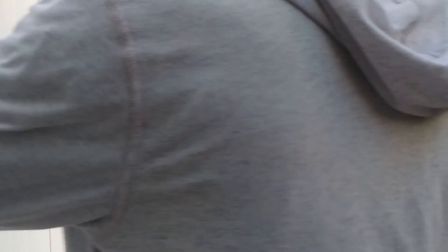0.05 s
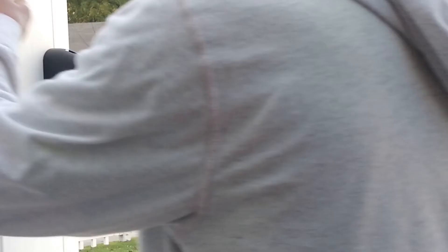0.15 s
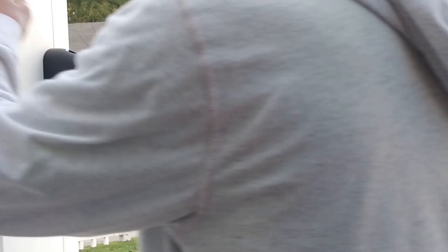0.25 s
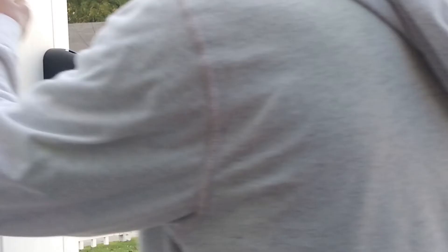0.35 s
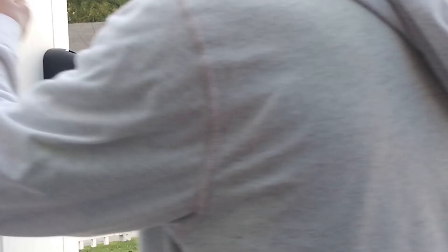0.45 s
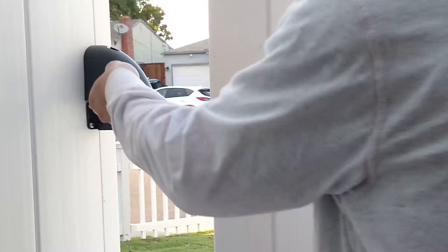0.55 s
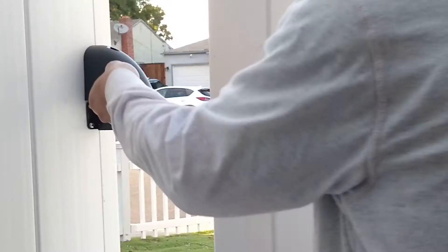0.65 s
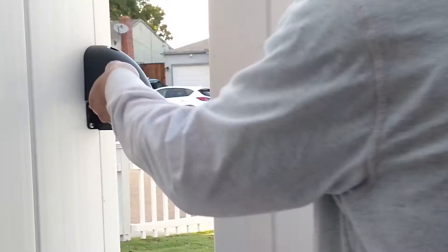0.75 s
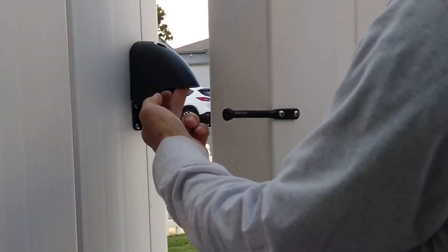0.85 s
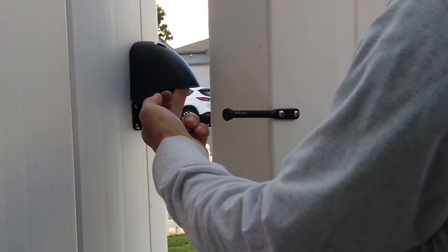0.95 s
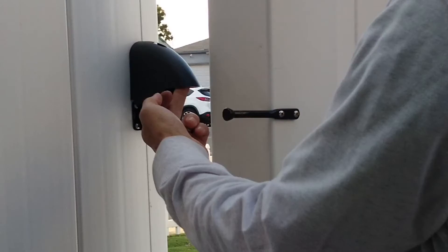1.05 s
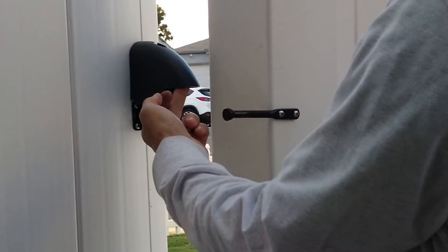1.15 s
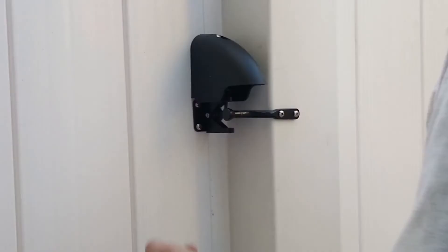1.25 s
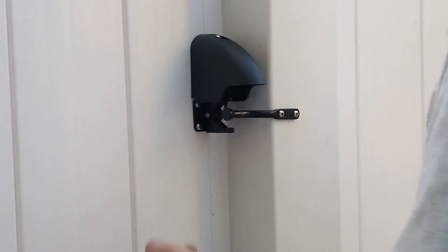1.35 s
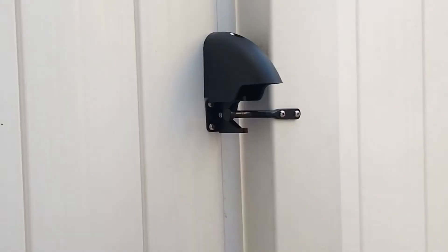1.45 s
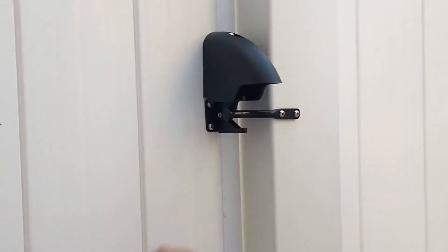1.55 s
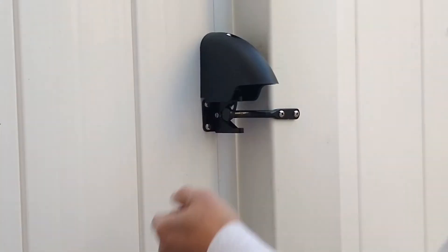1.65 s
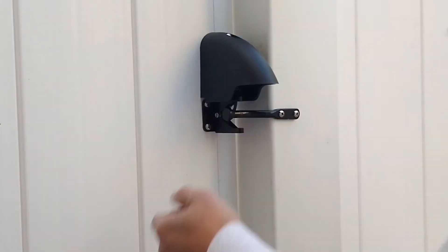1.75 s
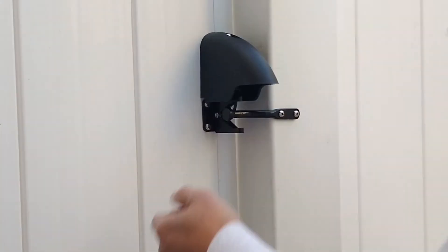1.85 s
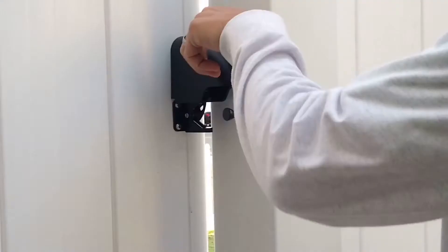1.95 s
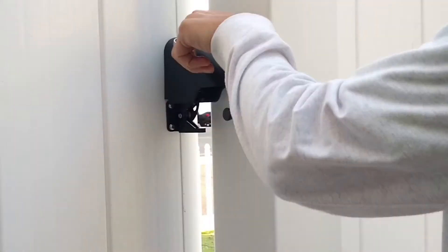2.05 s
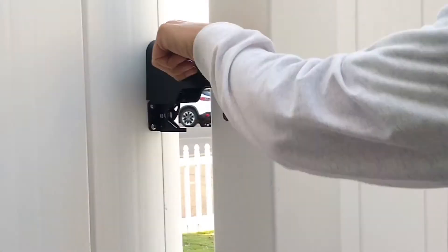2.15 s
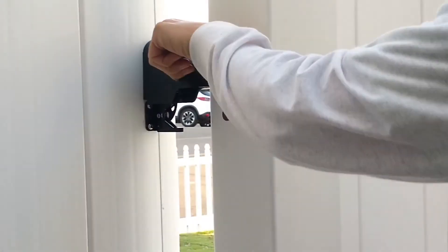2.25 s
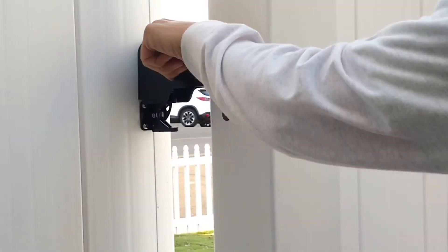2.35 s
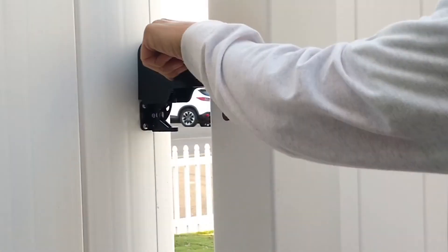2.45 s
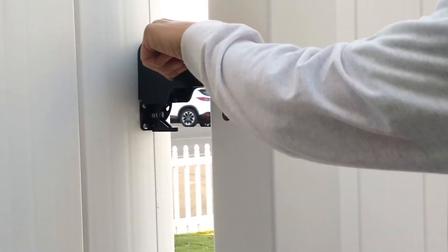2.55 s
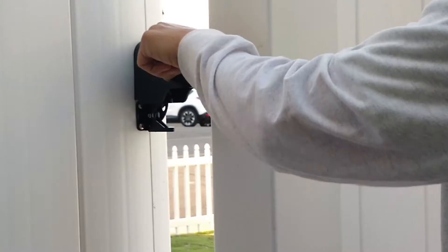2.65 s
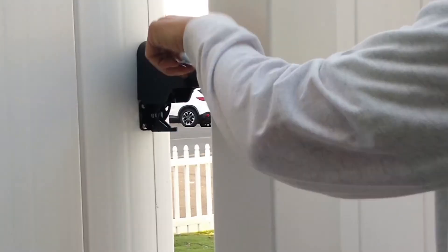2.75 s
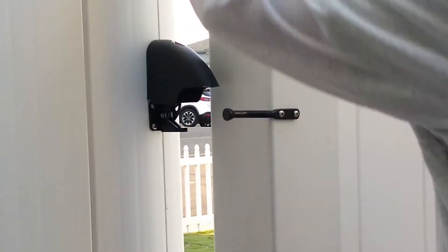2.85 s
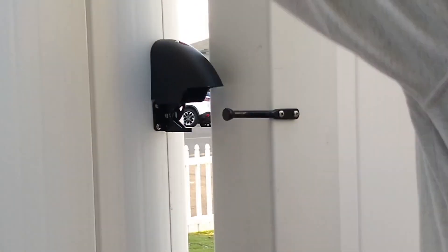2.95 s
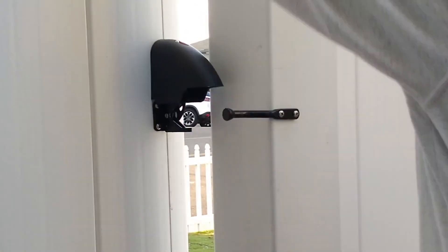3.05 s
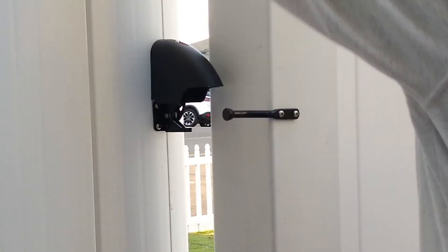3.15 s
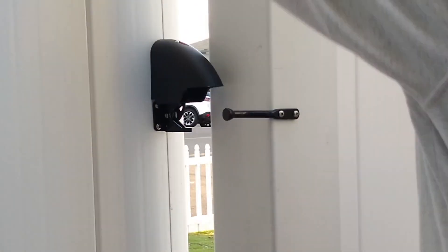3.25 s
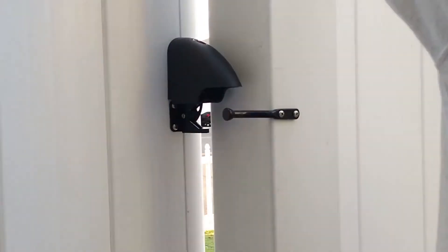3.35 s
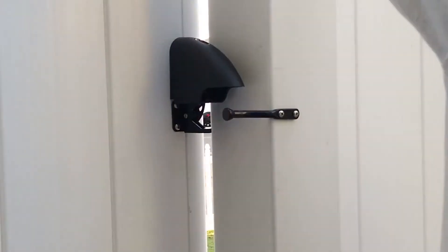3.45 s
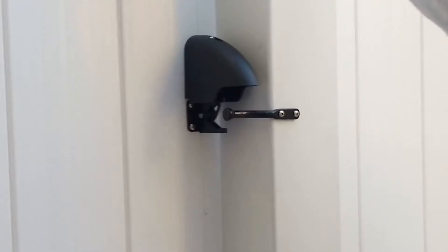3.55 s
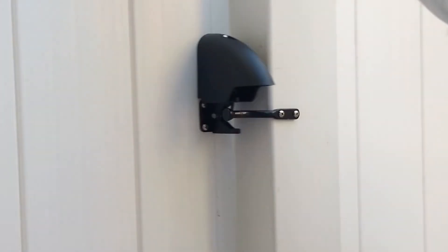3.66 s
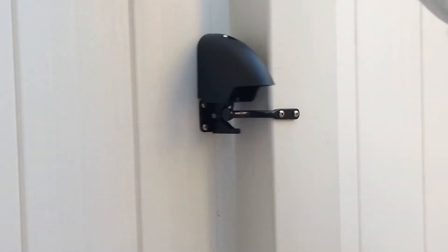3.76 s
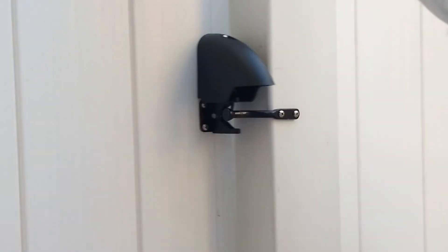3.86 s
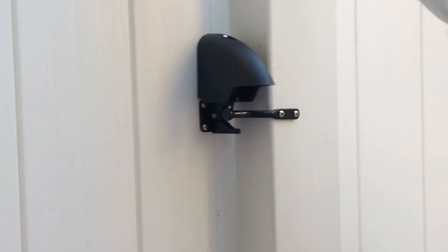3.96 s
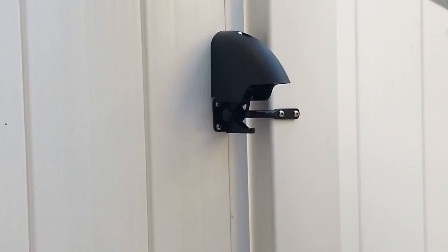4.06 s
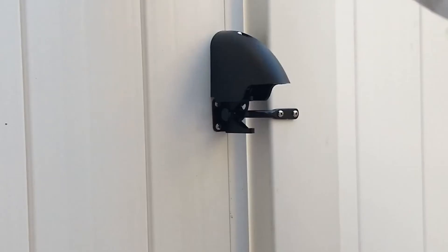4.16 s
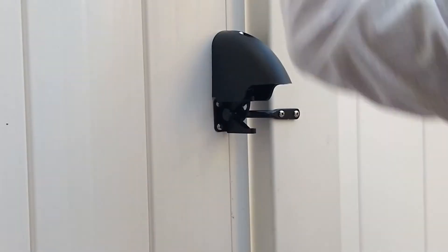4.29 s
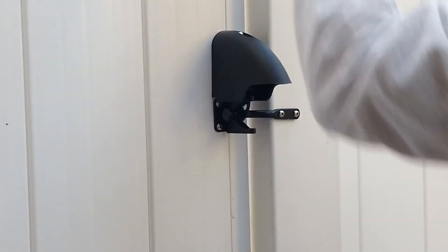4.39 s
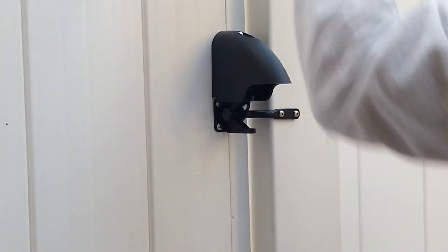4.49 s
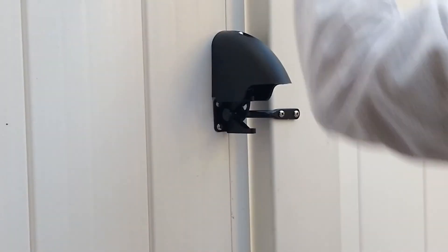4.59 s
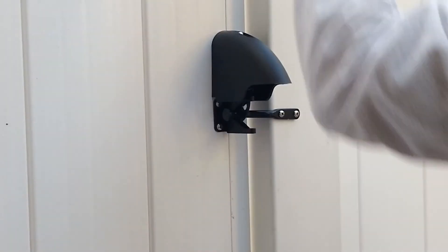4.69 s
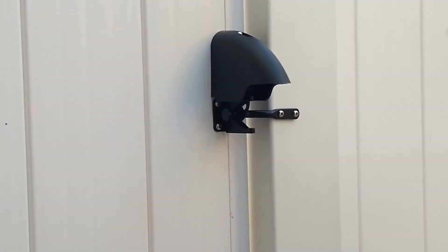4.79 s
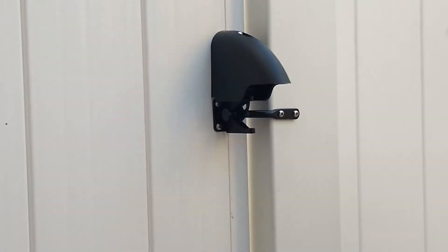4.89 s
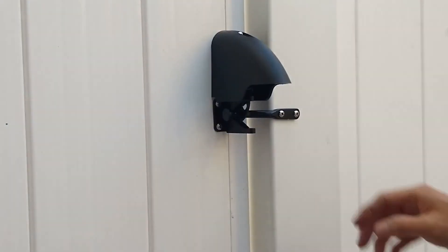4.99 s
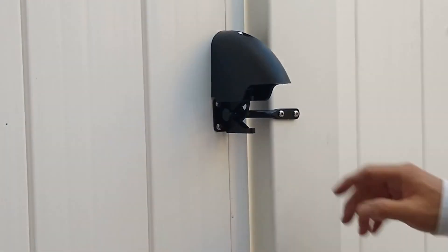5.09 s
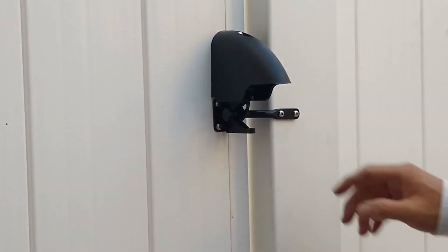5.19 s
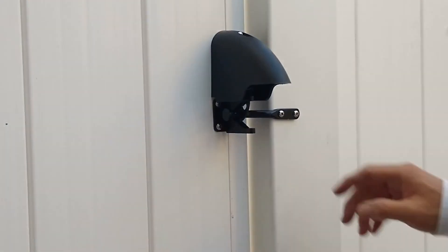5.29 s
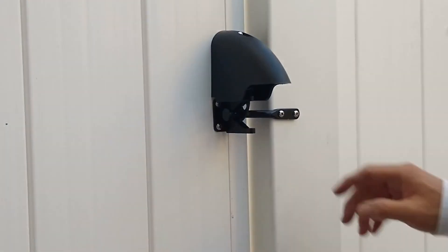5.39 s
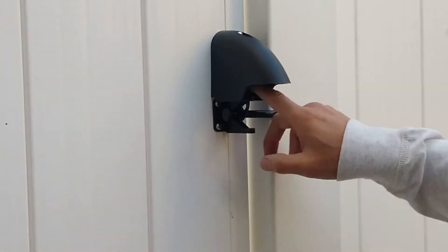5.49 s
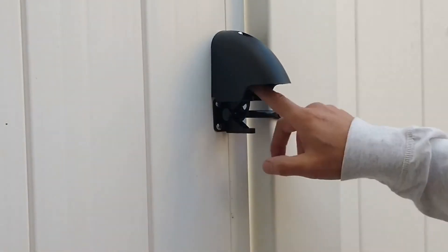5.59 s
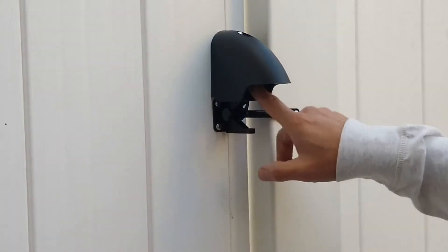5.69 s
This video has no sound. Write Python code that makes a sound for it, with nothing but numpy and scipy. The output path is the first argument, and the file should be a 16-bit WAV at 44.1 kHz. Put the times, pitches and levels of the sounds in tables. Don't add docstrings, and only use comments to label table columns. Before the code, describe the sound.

A steel latch in a plastic housing on a hollow vinyl gate, heard close and dry outdoors with a weak fence echo. Light scuffing and a brief squeal lead to a rattly clack, a pause with tiny clicks, one hard snap, then a violent double slam and loose rattle. Distant traffic and a little hiss continue throughout.

```python
import sys
import numpy as np
from scipy import signal
from scipy.fft import rfft, irfft, next_fast_len
from scipy.io import wavfile
from scipy.ndimage import uniform_filter1d

SR = 44100
rng = np.random.default_rng(int(sys.argv[2]) if len(sys.argv) > 2 else 0)


def inscribe(sig):
    pcm = np.round(np.clip(np.atleast_2d(sig).T, -1, 1) * 32767)
    wavfile.write(sys.argv[1], SR, pcm.astype(np.int16))


def nominal_scale(level):
    x = np.asarray(level, float) / 20
    return 10 ** x


N = 252693

# start in seconds, housing level in dB,
# panel and steel levels relative to the housing in dB, decay time T60 in seconds.
SLAMS = [(1.093, -51, -6, -10, 0.13), (2.0455, -26, -8, -18, 0.093), (2.075, -41, 11, 0.5, 0.055),
         (2.105, -44, 8.5, -35, 0.26), (2.139, -49, 5, -5, 0.14), (4.049, -46, -3.5, -18, .1),
         (4.183, -41.5, 8.5, -18, 0.14), (4.3853, -29.5, -4, -4.5, 0.16), (4.471, -25.5, -11, -6, 0.067),
         (4.485, -35.5, 1, -1.5, 0.22), (4.5485, -17.5, -20, -4.5, 0.068), (4.556, -24.5, -4.5, -6, 0.25),
         (4.7, -39, -14, -19.5, 0.068), (4.722, -47.5, 10.5, 1, 0.14), (4.788, -38.5, 4, -16, 0.11),
         (4.9275, -42, -16.5, -1, 0.07), (5.004, -46, -7, -8.5, 0.079)]
# start in seconds, housing level in dB, panel and steel relative levels in dB.
TICKS = [(1.65, -51, 0.5, -6.5), (1.675, -58, 2, -5), (2.202, -59, 1, -4), (2.212, -57, -9, 6),
         (2.297, -54, 3, 9), (2.394, -55, -8, -4.5), (2.458, -38, -28, -14.5), (2.689, -44, 0, -4.5),
         (2.699, -55, -10, -4), (2.921, -69.5, -3, 3), (4.054, -41, -6, -12), (4.091, -48, -10, -11),
         (4.1, -42, -10, -10), (4.062, -27, -24, -19), (4.111, -45, -16, 0), (4.137, -35, -15, -10.5),
         (4.344, -54, -14, -3), (4.473, -30, -13, -2), (4.778, -43, 1, -24), (4.922, -46, -20, -5),
         (5.166, -47, -30, -8), (5.182, -60, -20, -3)]
# start in seconds, housing level in dB, panel and steel relative levels in dB.
TAPS = [(0.384, -68, 16, -22), (.434, -60, 0, -29), (.917, -64, -2, 6), (.949, -53.5, -1, 0.5),
        (2.051, -59, 0, -5), (2.225, -40, -12, -18), (2.3064, -45.5, 6.5, -2), (2.328, -52.5, -27, -2),
        (2.551, -57.5, 7.5, -20), (2.668, -60, 4, -12), (2.809, -65.5, 7, -4), (3.105, -59, -6, -13),
        (3.163, -48, -16, -16), (3.194, -49.5, -5, -17), (3.51, -55, -11, -13), (3.64, -67.5, 9, -2),
        (4.368, -50, -6, -1), (4.375, -40.5, -7, -10), (4.39, -35, 0, -5.5), (4.446, -45, -1, -1),
        (4.573, -21, -3, -13), (5.032, -45, -35, -12), (5.294, -45.5, -18, -17.5), (5.495, -56, -5, -13.5)]
# start in seconds, housing level in dB, decay time T60 in seconds.
DROP_RATTLE = [
    (3.868, -21.5, 0.085),
    (3.883, -32.5, 0.21),
]


def blows():
    texture = grit(per_s=780, spread_db=5.5, smooth=0.31, same=0.47)
    tick_t60_s, tap_t60_s = 0.0099, 0.0082
    drop_panel_db, drop_steel_db = -20, -21.5
    rattle = [(s, db, drop_panel_db, drop_steel_db, t60) for s, db, t60 in DROP_RATTLE]
    ticks = [(*row, tick_t60_s) for row in TICKS]
    taps = [(*row, tap_t60_s) for row in TAPS]
    heavy = sorted(shared(SLAMS, catch_db=-6.5, follow=0.29) + shared(rattle, catch_db=-3, follow=0))
    thin = sorted(shared(ticks, catch_db=-10, follow=0.98) + shared(taps, catch_db=-1, follow=0.55))
    out = 0
    for spot in range(2):
        slam_power, slam_tick = forces(heavy[spot::2], [-7.0, -6.5, -1.0, -1.0], rise=0.0099, tick=3.6)
        thin_power, thin_tick = forces(thin[spot::2], [-10.0, -4.0, 3.0, 5.5], rise=0.021, tick=3.1)
        power = slam_power * easing() + thin_power
        out = out + ring_bodies(power, slam_tick + thin_tick, texture, ring_db=3.5, edge_hz=4100)
    return out


def shared(rows, catch_db, follow):
    return [(s, db, db + panel, db + catch_db + follow * steel, db + steel, t60)
            for s, db, panel, steel, t60 in rows]


def forces(rows, trim_db, rise, tick):
    power, ticks, t = np.zeros((4, N)), np.zeros((4, N)), np.arange(SR // 3) / SR
    for s, *db, t60 in rows:
        t60 = max(t60, .004)
        rise_s = rise * t60
        shape = np.minimum(t / rise_s, 1) * nominal_scale(-60 * np.maximum(t - rise_s, 0) / t60)
        at, gain = round(s * SR), nominal_scale(np.add(db, trim_db))[:, None]
        power[:, at:at + len(t)] += ((gain * shape) ** 2)[:, :N - at]
        ticks[:, at] += gain[:, 0] * tick
    return power, ticks


def grit(per_s, spread_db, smooth, same):
    size_db = spread_db * np.minimum(rng.exponential(1, N), 3)
    slips = (rng.random(N) < per_s / SR) * rng.choice([-1, 1], N) * nominal_scale(size_db)
    hiss, same = rng.standard_normal((3, N)), np.clip(same, 0, 1)
    common = evened(slips) + smooth * hiss[0]
    apart = np.sqrt((1 - same ** 2) * (1 + smooth ** 2)) * hiss[1:]
    return evened(same * common + apart)


# start and length in seconds, level change in dB.
EASES = [(0.683, 0.054, -4), (1.378, 0.053, -5.5), (1.423, 0.18, -18), (2.115, .022, -7),
         (2.156, 0.048, -5), (2.335, .05, -11), (2.44, .02, 0), (3.87, 0.026, -3.5), (3.922, 0.053, 0.5),
         (4.162, .02, -16), (4.235, 0.11, -8), (4.453, 0.016, 3), (4.835, 0.11, -3)]
EASE_REACH = (.3, .01, 0.45, 1)


def easing():
    db = np.zeros(N)
    for s, length, change_db in EASES:
        db[round(s * SR):round((s + length) * SR)] += change_db
    return nominal_scale(2 * np.outer(EASE_REACH, uniform_filter1d(db, size=90)))


# frequency in Hz, bandwidth in Hz, level in dB.
HOUSING = [(390, 72, -3), (670, 30, -20.5), (904, 62, -13), (1158, 44, -3.5), (1353, 250, 4.5),
           (1723, 360, 2.5)]
# frequency in Hz, bandwidth in Hz, level in dB.
PANEL = [(170, 15, -11.5), (243, 45, 0), (336, 60, -3.5), (406, 140, -2), (554, 170, -19), (651, 112, -7.5),
         (737, 170, -4)]
# frequency in Hz, bandwidth in Hz, level in dB.
CATCH = [(2290, 77, -2.5), (2766, 110, -4), (2943, 25, -12.5), (3367, 570, 2.5), (4030, 770, -5.5)]
# frequency in Hz, bandwidth in Hz, level in dB.
STEEL = [(5900, 900, 3.5), (8900, 120, -16), (9550, 200, -16), (11620, 170, 0), (14600, 200, -13)]


def ring_bodies(power, ticks, texture, ring_db, edge_hz):
    common = texture.mean(0)
    bodies = (body(HOUSING, 690, 2510, .7 - ring_db, .012, .5),
              body(PANEL, 127.0, 620, -1.0, .012, .15),
              body(CATCH, 1840, edge_hz, .7 - ring_db, .012, .9),
              body(STEEL, 4300, 14730, 13.0 - ring_db, .04, 1.5))
    textures = .4 * common + texture, common + .5 * texture, texture, texture
    return sum(signal.oaconvolve(np.sqrt(p) * x + k, h, axes=1)[:, :N]
               for p, k, x, h in zip(power, ticks, textures, bodies))


def body(modes, lo_hz, hi_hz, thud_db, detune, odd):
    t, ring = np.arange(4000) / SR, 0
    for hz, width_hz, db in modes:
        shift, turn = rng.uniform(-1.3, 1, 2)
        phase = 2 * np.pi * hz * (1 + detune * shift) * t + odd * turn * np.array([[1], [-1]])
        decay = np.sqrt(width_hz) * np.exp(-np.pi * width_hz * t)
        ring = ring + nominal_scale(db) * decay * np.sin(phase) * np.minimum(t / 0.00074, 1)
    band = signal.butter(4, [lo_hz, hi_hz], "band", fs=SR, output="sos")
    knock = signal.sosfilt(band, 1. * (t == 0))
    h = evened(ring) + nominal_scale(thud_db) * evened(knock)
    return h / np.linalg.norm(h[0])


def evened(x):
    return x / np.sqrt(np.mean(x ** 2) + 1e-20)


# frequency in Hz, bandwidth in Hz, level in dB.
KEEPER = [(432, 44, 5), (668, 40, 0), (1128, 30, -5), (1323, 46, 3.5), (1462, 22, 9), (1570, 18, -1.5),
          (1715, 30, 6), (2430, 20, -13), (2800, 45, 5), (3171, 20, -6), (3480, 22, -3.5), (3660, 32, -4),
          (5405, 37, -13)]


def drop():
    drop_s, gap_s = 3.8642, .0031
    second = int(drop_s)
    hits = np.zeros((2, 1, SR))
    hits[0, 0, round(drop_s % 1 * SR)] = nominal_scale(3.5)
    for k in range(1, 5):
        hits[1, 0, round((drop_s % 1 + k * gap_s) * SR)] = nominal_scale(-5.5 - k)
    bodies = body(KEEPER, 610, 4740, 0.5, 0.0026, 0.37), body(KEEPER, 600, 4100, -2.5, .003, .5)
    sound = sum(signal.oaconvolve(x, h, axes=1) for x, h in zip(hits, bodies))
    return np.pad(sound, ((0, 0), (second * SR, N)))[:, :N]


# time in seconds, level in dB.
SETTLES = [
    (3.878, -11),
    (3.8845, -5.5),
    (3.892, -21),
    (3.901, -17.5),
    (3.914, -17),
    (3.921, -20.5),
]


def settling():
    return strikes(SETTLES, body(KEEPER, 1196, 3800, -2.5, .003, .6))


# time in seconds, level in dB.
SNAPS = [(2.0465, -14.5), (2.0525, -23), (2.076, -29), (2.46, -45), (2.691, -31), (3.8634, -23),
         (4.3867, -20.5), (4.4711, -9), (4.549, -12), (4.552, -11), (4.5545, -10), (4.558, -10),
         (4.57, -16.5), (4.574, -18)]


def snaps():
    return strikes(SNAPS, body(CATCH + STEEL, 1600, 15300, 14.0, 0.013, .9))


# frequency in Hz, bandwidth in Hz, level in dB.
PIN = [(3880, 120, -0.5), (4050, 160, -3), (5440, 80, -12), (8100, 150, -1), (8200, 90, -2),
       (9800, 60, -7.5), (11300, 60, -4), (11640, 60, -6.5), (13600, 180, -8)]
# time in seconds, level in dB.
PINGS = [
    (4.3685, -37),
    (4.3765, -36),
    (4.4712, -5.5),
    (4.478, -8),
    (4.482, -9),
    (4.4875, -10),
    (4.4975, -15.5),
    (4.545, -13),
    (4.5475, -12),
]


def pin_pings():
    return strikes(PINGS, body(PIN, 3000, 16000, -4.5, .002, .8))


# frequency in Hz, bandwidth in Hz, level in dB.
POST = [(554, 34, -6.5), (790, 41, -6.5), (944, 43, -1), (1120, 35, 1), (1233, 18, -2.5), (1274, 30, 2.5),
        (3027, 20, -12), (3300, 21, -14)]
# time in seconds, level in dB.
POST_BLOWS = [(2.0462, -32), (2.2525, -23), (2.2625, -26), (2.2655, -25.5), (4.472, -9.5), (4.5488, 0),
              (4.552, -2.5), (4.554, -2.5), (4.557, 0.5), (4.5665, -8), (4.5705, -4), (4.58, -12.5),
              (4.585, -14), (4.7885, -30.5)]


def post_blows():
    return strikes(POST_BLOWS, body(POST, 600, 3500, -2, .002, .3))


# time in seconds, level in dB.
GLINTS = [(.9512, -40), (1.65, -35), (2.0525, -29), (2.0765, -25), (2.085, -24), (2.088, -27.5),
          (2.091, -25), (2.1005, -27), (2.1045, -23), (2.113, -33), (2.138, -34), (2.145, -35),
          (2.2045, -25), (2.2135, -35), (2.2162, -35), (2.2355, -24), (2.2385, -25), (2.242, -28),
          (2.259, -20), (2.264, -20), (2.268, -16), (2.2968, -35), (2.329, -38), (2.395, -40), (2.401, -36),
          (2.408, -35), (2.415, -41), (2.422, -34), (2.428, -34), (2.46, -36), (2.691, -24), (2.702, -39),
          (3.864, -13.5), (3.872, -29), (3.9285, -36), (3.933, -26), (3.937, -23.5), (3.9385, -31),
          (3.945, -29), (4.3935, -22.5), (4.443, -24), (4.4475, -27.5), (4.549, -12), (4.5535, -10.5),
          (4.728, -38), (4.736, -31), (4.752, -29.5), (4.8095, -36), (4.929, -30)]


def glints():
    return strikes(GLINTS, body(STEEL, 8500, 16800, 13, .01, 1.5))


def strikes(rows, shape):
    hits = np.zeros((1, N))
    for s, db in rows:
        hits[0, round(s * SR)] = nominal_scale(db)
    return signal.oaconvolve(hits, shape, axes=1)[:, :N]


# time in seconds, level in dB, pitch in Hz.
CHINKS = [(1.321, -35, 3220), (1.325, -36, 5540), (1.346, -39, 3380), (1.364, -38, 5400),
          (1.372, -34, 5400), (1.651, -50, 11000), (2.0765, -36, 11500), (2.2045, -34, 11000),
          (2.256, -36, 12000), (2.26, -24, 10400), (2.265, -38, 11500), (2.3075, -42, 5260),
          (3.929, -47, 8500), (3.933, -31, 10530), (3.938, -28, 13200), (3.941, -38, 10500),
          (3.9445, -41, 11200), (4.017, -52, 9000), (4.029, -47, 11500), (4.035, -46, 11500),
          (4.042, -46, 11000), (4.0545, -43, 6500), (4.063, -44, 13500), (4.081, -46, 6000),
          (4.09, -42, 5540), (4.0905, -44, 11000), (4.101, -39.5, 5000), (4.1115, -39, 12500),
          (4.137, -42, 10000), (4.185, -50, 4500), (4.369, -40.5, 8000), (4.376, -43.5, 7980),
          (4.387, -34.5, 12000), (4.394, -34, 14800), (4.444, -35.5, 10000), (4.466, -35, 3500),
          (4.4705, -23, 4130), (4.472, -22.5, 8200), (4.477, -30, 13600), (4.487, -30, 11300),
          (4.488, -31, 4000), (4.545, -25, 8200), (4.549, -21.5, 7980), (4.5545, -24, 12490),
          (4.573, -26.5, 10000), (4.582, -30, 12000), (4.704, -48, 3070), (4.7265, -52, 7000),
          (4.7505, -48, 9060), (4.929, -35, 9960), (5.1665, -54, 12160)]


def chinks():
    out, t = np.zeros((2, N)), np.arange(600) / SR
    phases = rng.uniform(-.7, .7, (len(CHINKS), 2, 1))
    for (s, db, hz), phase in zip(CHINKS, phases):
        at = round(s * SR)
        u = hz * t / 5.5
        envelope = 6.5 * u * np.exp(-3 * u)
        out[:, at:at + len(t)] += nominal_scale(db) * envelope * np.sin(2 * np.pi * hz * t + phase)
    return out


# start in seconds, level in dB, pitch in Hz, T60 in seconds.
BOOMS = [(.63, -55, 126, .12), (2.421, -58, 129, .12), (1.318, -48.5, 101, 0.11), (1.385, -48, 118, 0.13),
         (2.092, -28.5, 220, 0.12), (2.13, -40, 130, 0.11), (2.124, -33.5, 493, .08),
         (2.158, -40.5, 188, 0.086), (2.257, -49, 119, .1), (2.585, -52, 210, 0.091),
         (2.69, -51, 130, 0.065), (4.093, -50, 120, 0.1), (4.183, -31, 168, 0.044),
         (4.219, -44, 120, 0.057), (4.409, -31, 434, 0.11), (4.425, -31.5, 229.4, 0.77),
         (4.475, -29, 226, 0.27), (4.506, -33, 240.7, 0.37), (4.551, -23, 233, 0.19)]


def booms():
    out, t = np.zeros(N + SR), np.arange(SR // 3) / SR
    for s, db, hz, t60 in BOOMS:
        envelope = nominal_scale(db - 60 * t / t60) * (1 - np.exp(-t / 0.0021))
        out[round(s * SR):][:len(t)] += envelope * np.sin(2 * np.pi * hz * t)
    return out[:N] * nominal_scale(1.1 * np.array([[1], [-1]]))


# start in seconds, housing level in dB,
# panel and steel relative levels in dB, decay time T60 in seconds.
SCUFFS = [(.155, -50, -2, -2.5, 0.14), (.618, -59, 0.5, -5, 0.19), (.65, -57.5, 1, -0.5, 0.15),
          (.925, -79.5, 7, 5.5, 0.074), (1.207, -60, -2, -0.5, 0.06), (1.263, -65, -6, 5, 0.069),
          (1.3155, -40.5, -20, 1, 0.2), (1.338, -45.5, -5, 3, 0.17), (1.363, -44, -26, -2, 0.18),
          (1.914, -53.5, -2, -3.5, 0.15), (2.082, -44, 11.5, -5, 0.15), (2.231, -43.5, -1.5, -4, 0.17),
          (2.255, -40, 3, -9, 0.13), (2.398, -65, -8, -2, 0.19), (2.69, -60.5, 2, -3.5, 0.14),
          (3.18, -65, -21, -24, 0.19), (3.928, -44.5, -17, -8, 0.11), (4.08, -45, 2, -4, 0.14),
          (4.441, -34, -1, -8, 0.027), (4.382, -37.5, -5, -6, 0.044), (4.5425, -21.5, -3, -11, 0.086),
          (4.807, -44.5, 7, -15, 0.031)]
# peak in seconds, catch level in dB,
# swell T60 and fade T60 in seconds, panel relative level in dB.
DRAGS = [(.16, -59.5, 0.13, 0.17, -20), (.99, -70.5, 0.51, 1.5, -6), (1.314, -49, 0.5, 0.18, -10),
         (3.19, -70, 0.23, 0.49, -7), (3.33, -73, 0.23, 0.28, -6), (4.07, -53, 0.18, 0.49, 0.5),
         (4.5, -48, 0.3, 0.34, 4.5), (4.581, -38.5, 0.37, 0.19, -2.5), (4.615, -50.5, .2, 0.18, -9),
         (4.79, -53, 0.26, 0.16, 7), (5.17, -70.5, 0.5, 0.28, -9)]
# peak in seconds, panel level in dB, swell T60 and fade T60 in seconds.
SHUDDERS = [
    (1.39, -57.5, .5, 0.23),
    (2.1, -39.5, 0.13, 0.35),
    (2.2, -52, 0.45, 0.76),
    (2.469, -62, .35, 0.076),
    (3.926, -57.5, .15, 0.68),
    (4.24, -57.5, 1, 0.11),
    (4.421, -36.5, .12, 1),
    (4.5, -48, 0.46, .4),
    (4.575, -33.5, 0.12, 0.32),
]
SHUDDER_DB = (-7, -0.5, -17, -38.5)


def scuffs():
    rows = shared(SCUFFS, catch_db=2.6, follow=2.1)
    power, ticks = forces(rows, [-3.0, -4.5, 3.0, 5.0], rise=0.061, tick=0)
    housing_db, steel_db = -9, -4
    for s, db, rise, fall, panel_db in DRAGS:
        power += swell(s, np.add(db, [housing_db, panel_db, 0, steel_db]), rise, fall)
    for s, db, rise, fall in SHUDDERS:
        power += swell(s, np.add(db, SHUDDER_DB), rise, fall)
    texture = grit(per_s=3300, spread_db=1.0, smooth=0.57, same=0.38)
    return patchy(ring_bodies(power * easing(), ticks, texture, ring_db=-31.0, edge_hz=5830))


def swell(s, db, rise_t60, fall_t60):
    t = np.arange(N) / SR - s
    slope = np.maximum(t / fall_t60, -t / rise_t60)
    return nominal_scale(2 * np.array(db))[:, None] * np.exp(-2 * np.log(1000) * slope)


def patchy(x):
    spread_db = 2
    z = signal.stft(x, nperseg=256)[2]
    spots = rng.standard_normal(z.shape[:0:-1]).T
    spots = uniform_filter1d(uniform_filter1d(spots, size=5, axis=0), size=4, axis=1)
    gain = nominal_scale(spread_db * evened(spots) - spread_db ** 2 / 17.0)
    return signal.istft(z * gain, nperseg=256)[1][:, :N]


# start and length in seconds, level in dB, first and last pitch in Hz.
SCRAPES = [
    (1.172, 0.044, -63, 4940, 6100),
    (1.22, 0.057, -68, 3240, 4100),
    (1.263, 0.096, -60, 3530, 3320),
    (1.308, 0.081, -54, 3130, 3460),
    (1.34, 0.062, -55, 5840, 5000),
    (0.654, 0.033, -59, 4160, 2900),
]


def scrapes():
    width_hz = 400
    out, r = np.zeros(N), np.exp(-np.pi * width_hz / SR)
    for s, length, db, first_hz, last_hz in SCRAPES:
        slips = rng.standard_normal(SR // 5) ** 3
        u = np.arange(round(length * SR)) / (length * SR)
        turn = np.exp(2j * np.pi * np.cumsum(first_hz + (last_hz - first_hz) * u) / SR)
        squeal = (turn * signal.lfilter([1], [1, -2 * r, r * r], slips[:len(u)] / turn)).real
        out[round(s * SR):][:len(u)] += nominal_scale(db) * np.sin(np.pi * u) * evened(squeal)
    return out


def groan():
    out = np.zeros(N)
    at = np.arange(round(1.094 * SR), round(1.155 * SR))
    turn = 2 * np.pi * np.cumsum(np.linspace(213.6, 210.6, len(at))) / SR
    slips = 0.9 * np.sin(turn) + 1.2 * np.sin(5 * turn) + 0.82 * np.sin(6 * turn)
    out[at] += nominal_scale(-59.5) * slips * signal.windows.tukey(len(at), .4)
    return out


# start and length in seconds, fundamental and octave levels in dB.
HOOTS = [
    (0.33, 0.15, -59, -83),
    (0.381, 0.084, -88, -59.5),
    (0.447, 0.13, -72, -62),
    (0.591, 0.1, -76, -57),
    (3.925, 0.094, -59, -64),
    (4.02, 0.16, -60, -49.5),
    (4.19, 0.11, -76.5, -66),
]


def hoots():
    out = np.zeros(N)
    for s, length, low_db, high_db in HOOTS:
        at = np.arange(round(s * SR), round((s + length) * SR))
        wander = np.cumsum(rng.standard_normal(SR // 4))[:len(at)] * 0.0035
        turn = np.pi * 770 * at / SR + wander
        beat = 1 + .7 * np.sin(2 * np.pi * 25 * at / SR + 1.4)
        tone = nominal_scale(low_db) * np.sin(turn) + nominal_scale(high_db) * beat * np.sin(2 * turn)
        out[at] += tone * signal.windows.tukey(len(at), .6)
    return out


def turbulent_air(x):
    flutter = evened(uniform_filter1d(rng.standard_normal(N), 500))
    return x * (.8 + .4 * flutter)


def fence_echo(x, t60, start):
    taps = np.zeros((2, 8000))
    slots = np.arange(start, 7980, 12)
    at = slots + rng.integers(0, 12, (2, len(slots)))
    np.put_along_axis(taps, at, rng.choice([-1., 1.], at.shape), 1)
    taps *= nominal_scale(-60 * np.arange(8000) / SR / t60)
    return signal.fftconvolve(x, taps / np.linalg.norm(taps[0]), axes=1)[:, :N]


# frequency in Hz, density in dB per Hz.
HUM = [(30, -36), (70, 2), (150, 0), (900, -0.5), (1400, -7), (2200, -17.5), (4000, -28), (7000, -35.5),
       (15000, -44)]
# time in seconds, level in dB.
HUM_DB = [(0, -66), (2, -66.5), (3.799, -67.5), (5.099, -66.5), (5.73, -69)]
# frequency in Hz, coherence from 0 to 1.
SAME = [(60, 0.94), (300, 0.85), (800, 0.24), (1500, 0.09), (3000, 0.17), (15000, .05)]


def street():
    frames, hz = N // 256 + 5, np.fft.rfftfreq(1024, 1 / SR)
    a, b, c, d, patches = rng.standard_normal((frames, 513, 5)).T
    patches = evened(uniform_filter1d(uniform_filter1d(patches, 10, 0), 14, 1))
    same, left = np.clip(read(SAME, hz), -1, 1)[:, None], a + 1j * b
    right = same * left + np.sqrt(1 - same ** 2) * (c + 1j * d)
    z = np.array([left, right]) * nominal_scale(read(HUM, hz)[:, None] + 1.2 * patches)
    hum = signal.istft(z, nperseg=1024, noverlap=768)[1][:, :N]
    s, db = np.transpose(HUM_DB)
    return nominal_scale(np.interp(np.arange(N) / SR, s, db) + 3.5) * evened(hum)


def read(points, hz):
    f, value = np.transpose(points)
    return np.interp(np.log(hz + 1), np.log(f + 1), value)


def scene():
    near = blows() + drop() + settling() + snaps() + pin_pings() + post_blows() + glints()
    near = near + booms() + scuffs() + scrapes() + turbulent_air(groan() + hoots())
    near = signal.sosfilt(signal.butter(2, 80, "high", fs=SR, output="sos"), near)
    near[0] = np.roll(near[0], 2)
    near += chinks()
    echo = nominal_scale(-17) * fence_echo(near, t60=.15, start=150)
    return (near + echo + street()) * nominal_scale(np.array([[.7], [-.7]]))


def top_cut(x):
    return signal.sosfilt(signal.butter(12, 16550, fs=SR, output="sos"), x)


# frequency in Hz, share of the other side subtracted.
CROSS = [(60, 0.48), (300, 0.55), (1100, 0.7), (2200, 0.5), (6600, 0.28), (8800, 0.2), (11000, 0.089)]
# frequency in Hz, level in dB.
COLOUR = [(100, 7.5), (250, 1), (600, -1.5), (1300, -3), (2200, 0), (4200, -0.5), (7000, -4), (11500, -1.5),
          (14000, -1.5), (15400, -0.5)]


def record(dry):
    size = next_fast_len(N + 2048)
    hz = np.fft.rfftfreq(size, 1 / SR)
    lag = 19.7
    late = np.clip(read(CROSS, hz), 0, .97) * np.exp(-2j * np.pi * hz * lag / SR)
    sign = np.array([[1], [-1]])
    both = rfft(dry[0] + sign * dry[1], size) * (1 - sign * late)
    null_hz, null_width_hz, null_depth = 2215, 110, .85
    nulls = sum(np.exp(-((hz - k * null_hz) / (null_width_hz * np.sqrt(k))) ** 2) for k in range(1, 5))
    both[0] *= 1 - null_depth * nulls
    mid, side = irfft(both, size)[:, :N] / 2
    hiss_band = signal.butter(8, 14700, fs=SR, output="sos")
    hiss = nominal_scale(-81.0) * signal.sosfilt(hiss_band, rng.standard_normal(dry.shape))
    crossed = mid + sign * side + hiss
    crossed = signal.sosfilt(signal.butter(4, 74, "high", fs=SR, output="sos"), crossed)
    hz = np.linspace(0, SR / 2, 513)
    gain = nominal_scale(read(COLOUR, hz) - 32.5 * (hz > 15650)) * (hz < 16500)
    colour = signal.firwin2(511, hz, gain, fs=SR)
    mix = signal.oaconvolve(crossed, colour[None], "same", axes=1)
    return top_cut(mix)


dry = scene()
out = record(dry)
inscribe(out)
```